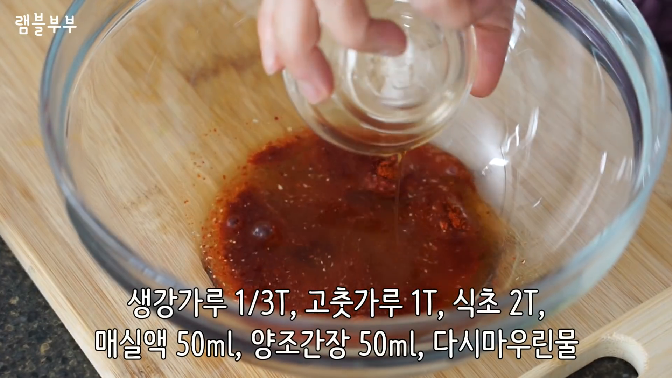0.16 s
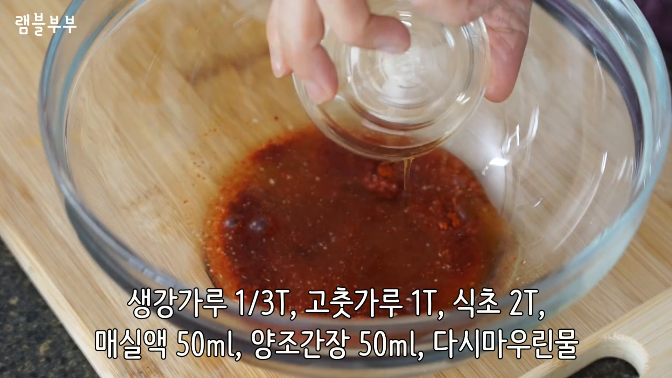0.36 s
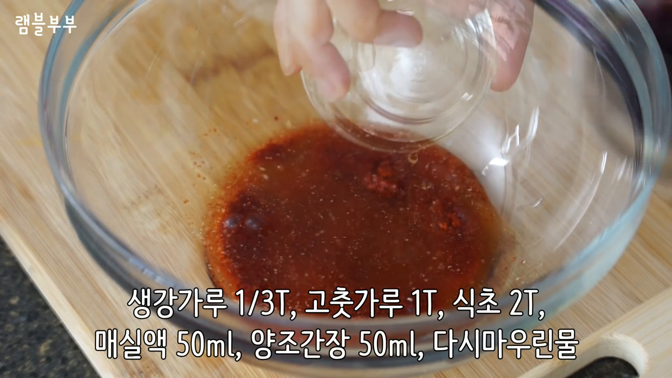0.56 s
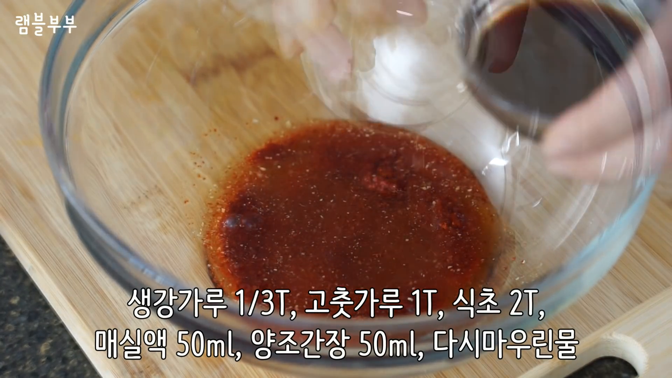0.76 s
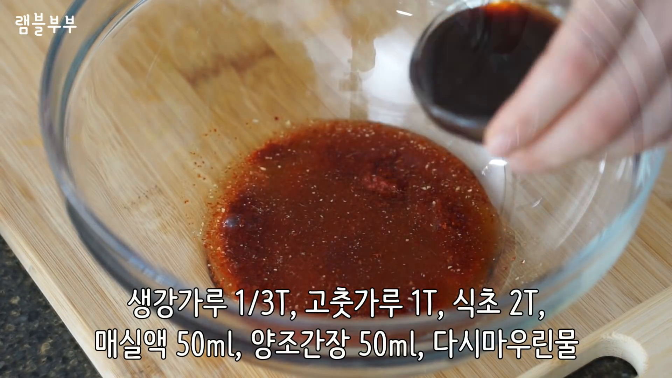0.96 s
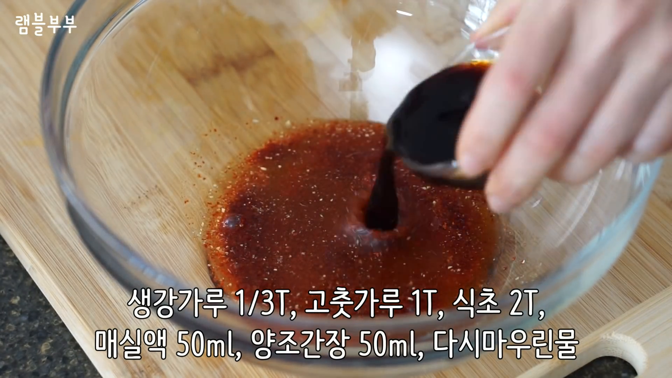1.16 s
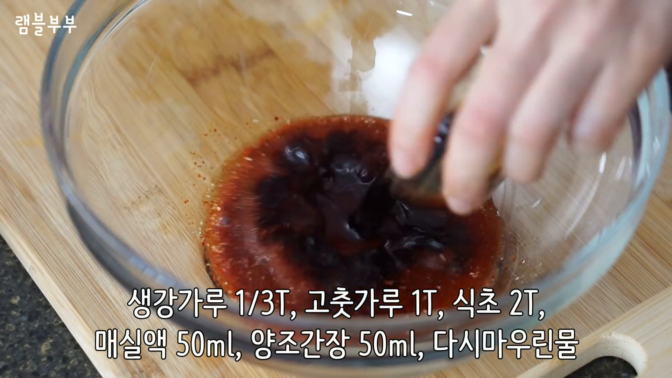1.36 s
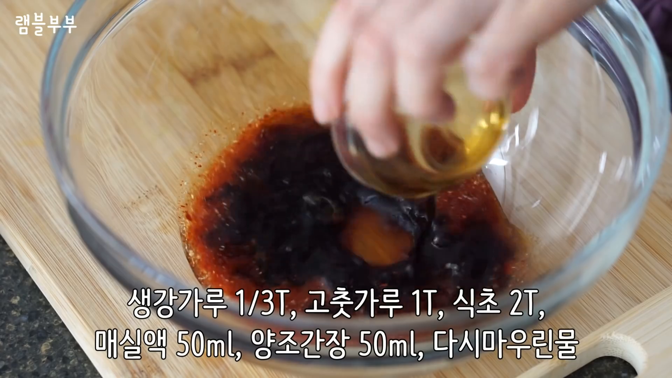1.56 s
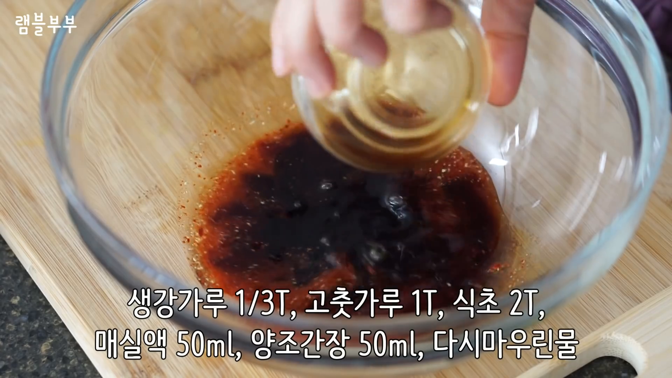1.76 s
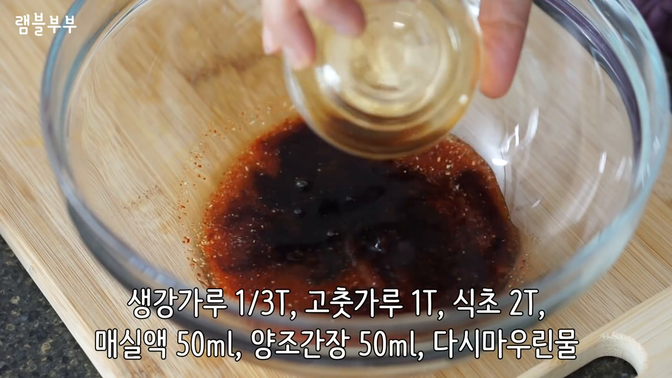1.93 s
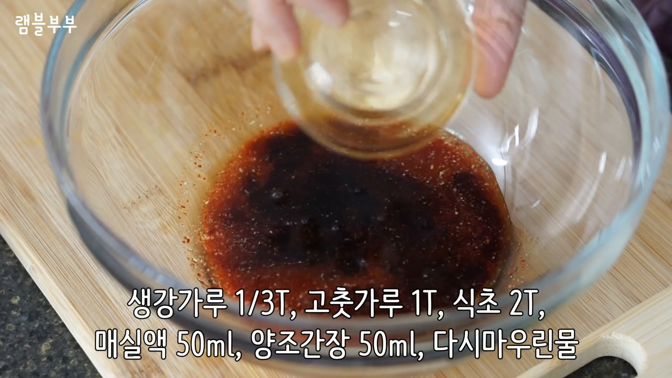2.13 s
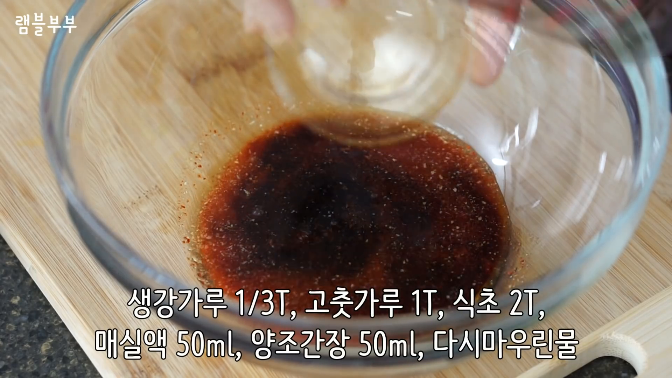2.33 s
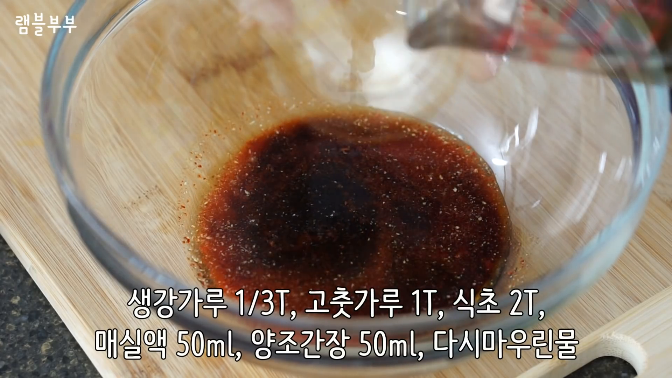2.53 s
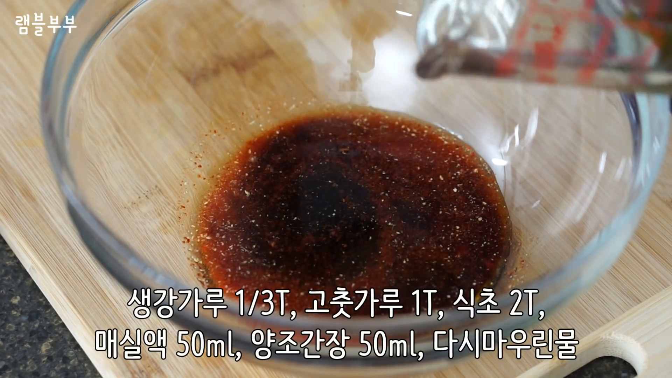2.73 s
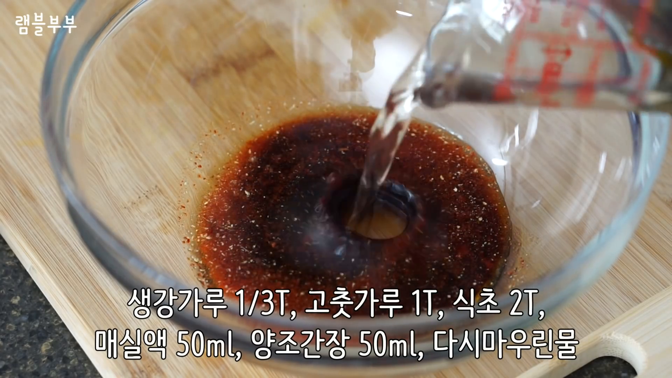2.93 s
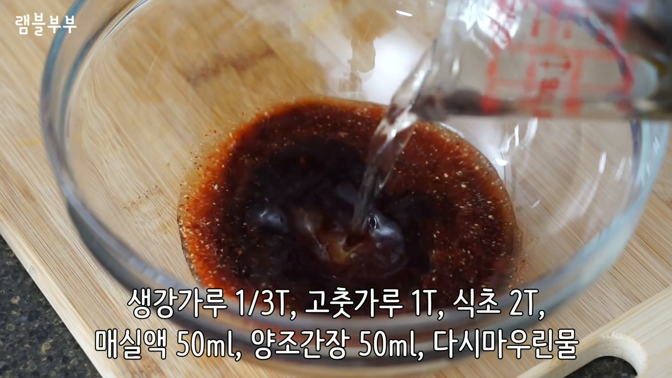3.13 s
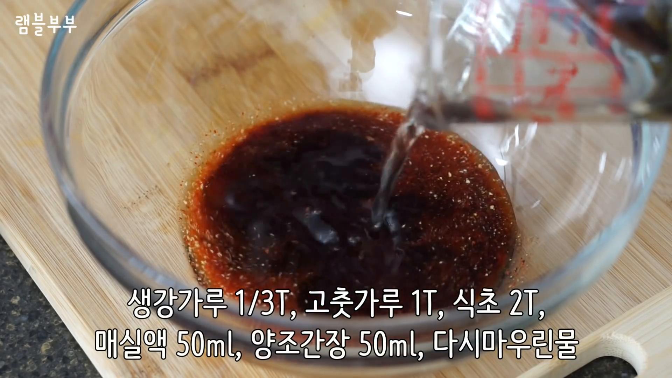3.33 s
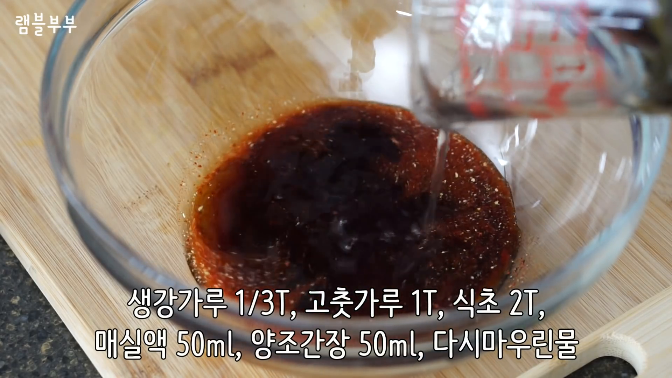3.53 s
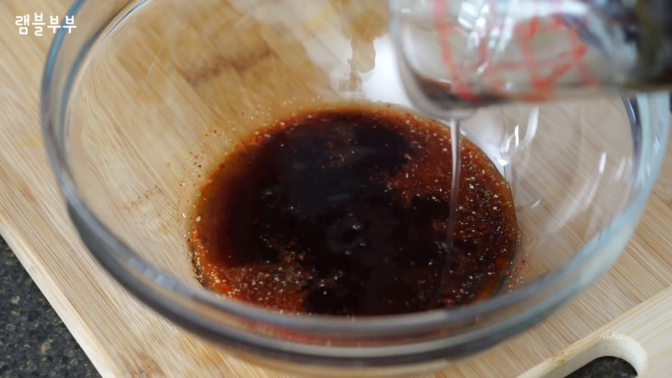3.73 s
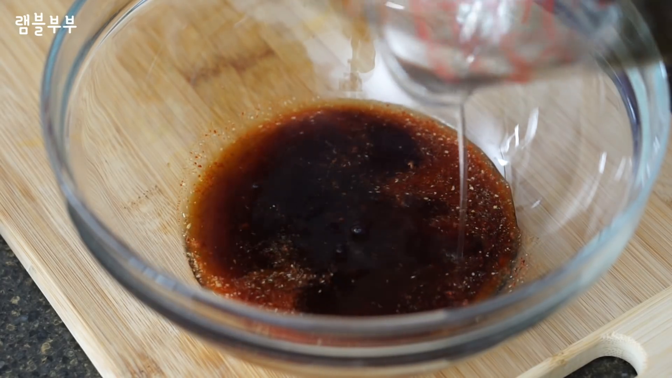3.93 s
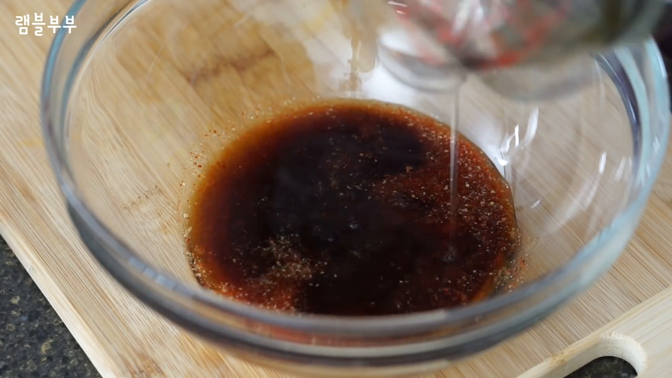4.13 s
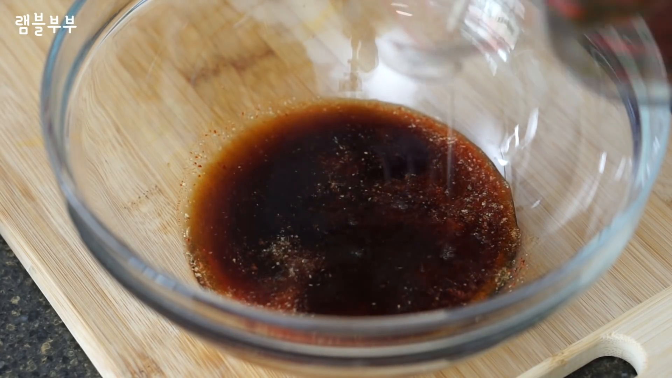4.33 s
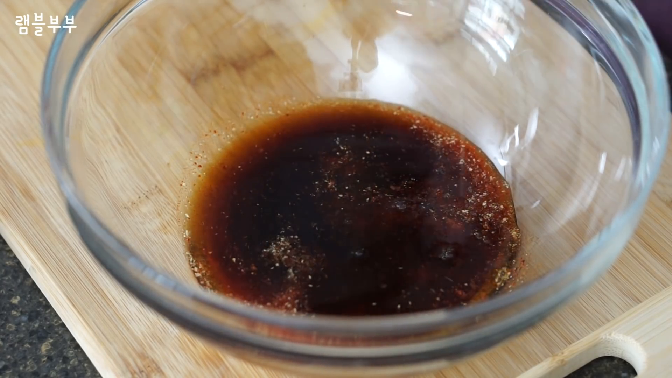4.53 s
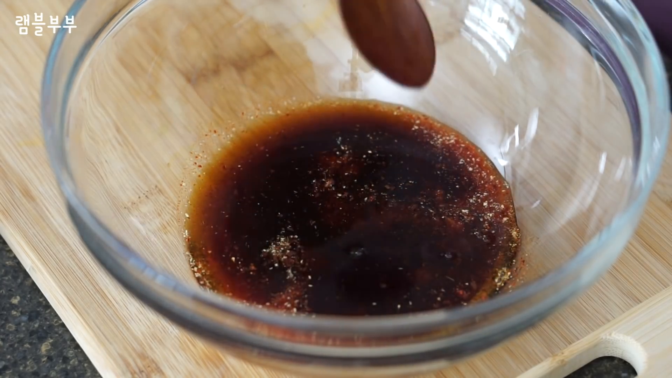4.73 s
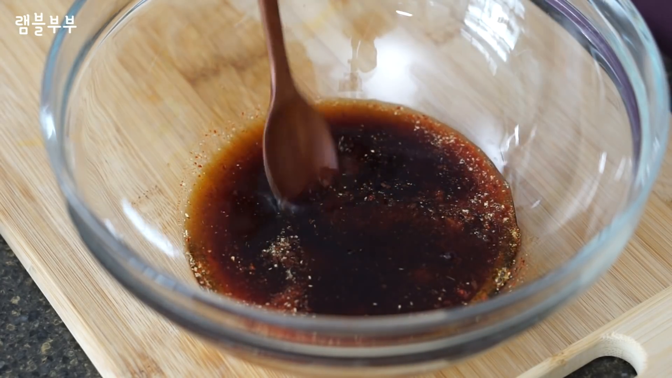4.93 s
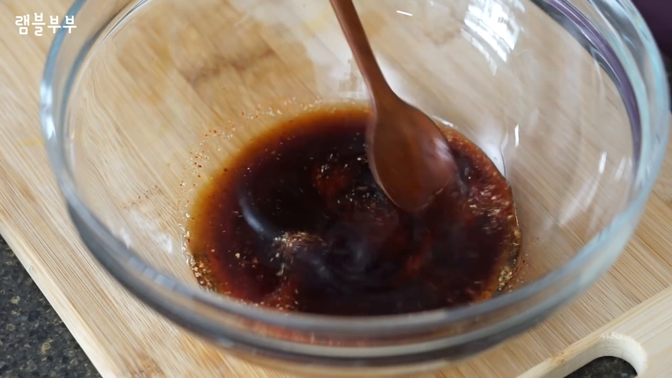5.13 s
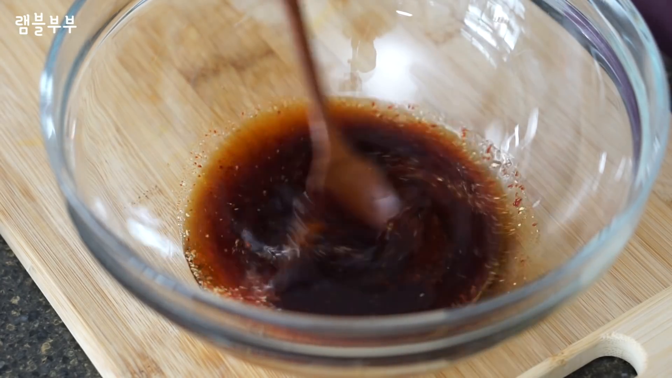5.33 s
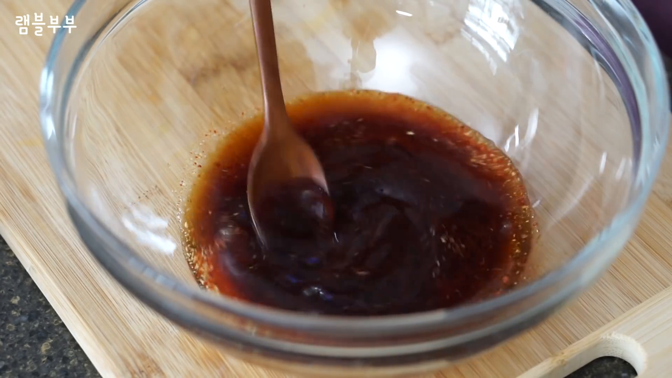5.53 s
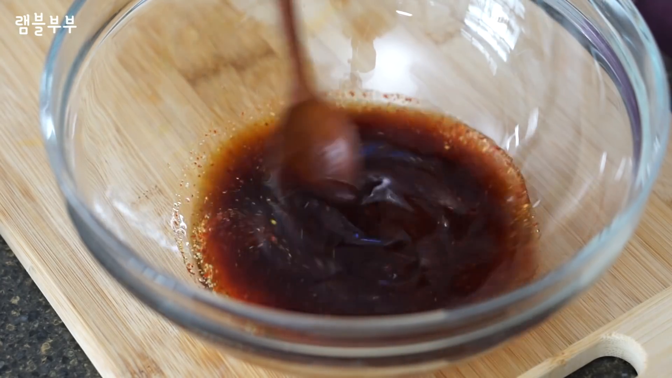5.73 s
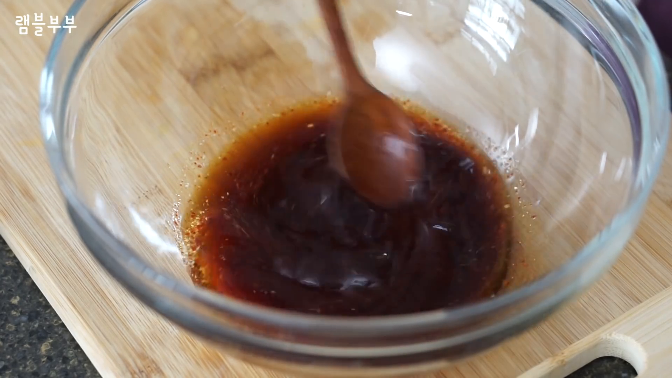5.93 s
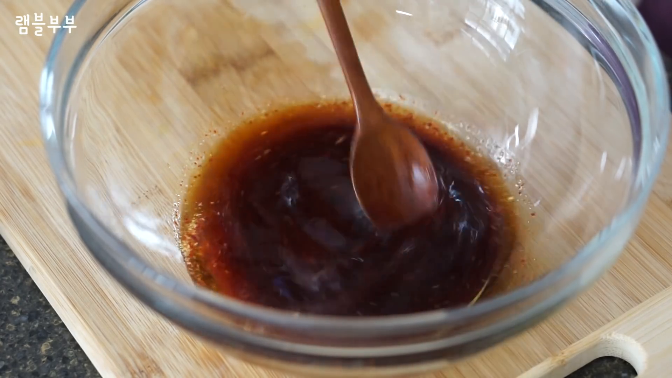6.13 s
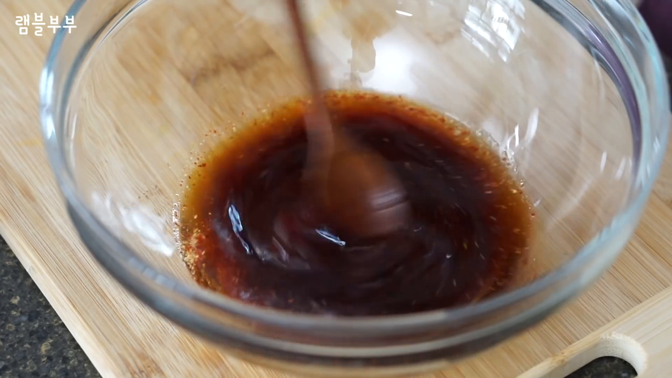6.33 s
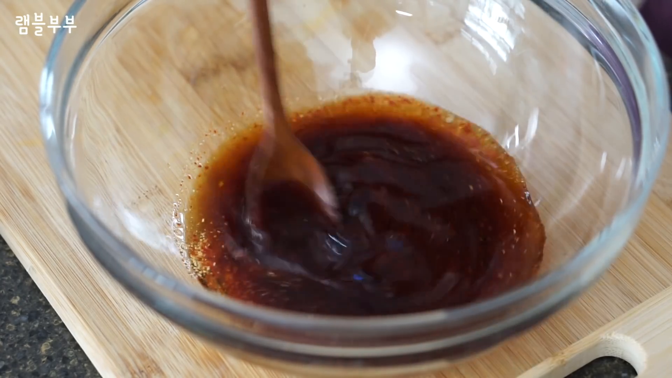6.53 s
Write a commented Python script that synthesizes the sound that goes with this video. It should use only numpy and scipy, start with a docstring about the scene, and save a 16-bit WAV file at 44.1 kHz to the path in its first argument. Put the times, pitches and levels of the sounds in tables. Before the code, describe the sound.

In a small kitchen with low rumble, soft hiss and faint appliance hum, a faint glass tick precedes a quick glugging pour of sauce into a glass bowl. After a pause, thinner stock splashes in. A wooden spoon then stirs wetly, clacks sharply on the glass and knocks the bowl once on its wooden board with a dull ringing thud, followed by bright plinking drips. Close stereo microphone, short echo.

```python
"""Liquid glugs, plinks and spatters as soy sauce and stock are tipped into a glass bowl of sauce and stirred.
Ringing air bubbles make the glugs, froth and burble; short noise clicks make the slaps; gusting noise is the splash.
Glass clacks are clicks with brief modes. A wooden spoon knocks the bowl once on its wooden board: thud plus modes.
Nearby surfaces and a small kitchen echo the liquid and clacks. Behind lie rumble, soft hiss and an appliance hum,
with a faint thin whine that comes and goes."""
import sys
import numpy as np
from scipy import signal
from scipy.fft import rfft, irfft
from scipy.io import wavfile

SR = 44100
rng = np.random.default_rng(int(sys.argv[2]) if len(sys.argv) > 2 else 0)


def materialize(psi):
    """Save the field psi as 16-bit PCM at rate SR to the path in sys.argv[1].

    A 1-D psi becomes a single channel; in a 2-D psi each row is a channel.
    """
    bounded = np.clip(np.atleast_2d(psi).T, -1, 1)
    quanta = np.round(bounded * 32767).astype(np.int16)
    wavfile.write(sys.argv[1], SR, quanta)


N = 294147
T = np.arange(N) / SR


def undb(db):
    """Decibels to gain."""
    return 10 ** (np.asarray(db) / 20)


def unit(x):
    """Scale to rms 1."""
    return x / np.sqrt(np.mean(x ** 2))


def fade(t, t60):
    """Free decay, 60 dB in t60 seconds."""
    return np.exp(-np.log(1000) * t / t60)


def add(out, s, sound):
    """Mix a sound in at time s."""
    i = int(s * SR)
    out[..., i:i + sound.shape[-1]] += sound[..., :max(N - i, 0)]


def colour(x, points):
    """Filter by a spectrum of (f/Hz, level/dB) points, joined on a log frequency axis."""
    hz, db = np.transpose(points)
    f = np.fft.rfftfreq(x.shape[-1], 1 / SR)
    gain = undb(np.interp(np.log(f + 1), np.log(hz), db))
    return irfft(rfft(x) * gain, x.shape[-1])


def band(x, hz, kind, order=2):
    """Butterworth filter."""
    hz = np.minimum(hz, SR / 2 - 1000)
    return signal.sosfilt(signal.butter(order, hz, kind, fs=SR, output="sos"), x)


def pan(db):
    """Channel gains for a left-minus-right level."""
    return undb(np.array([[db], [-db]]) / 2)


def stereo_noise(side_db, wide_hz):
    """Noise that is alike in both channels in the bass and spreads out above wide_hz."""
    mid, side = rng.standard_normal((2, N))
    side = undb(side_db) * band(side, wide_hz, "high", order=1)
    return mid + side * np.array([[1], [-1]])


def bubble(hz, t60, rise, wobble, onset=0.057):
    """A pocket of air pinches off and rings; its pitch glides by rise octaves/s and wobbles as it deforms."""
    t = T[:int(t60 * SR) + 2]
    swing = (1 - np.exp(-t / (onset * t60))) * fade(t, t60)
    shape = np.interp(t, np.linspace(0, t60, len(wobble)), wobble)
    pitch = np.minimum(hz * 2 ** (rise * t + shape), SR / 2)
    phase = 2 * np.pi * np.cumsum(pitch) / SR
    return swing / swing.max() * np.sin(phase)


def plink(hz, t60, rise, wobble_octave_s=.0009, max_wobble_octaves=.05):
    """One bubble; the sooner it dies, the rougher its pitch, up to a limit."""
    depth = min(wobble_octave_s / t60, max_wobble_octaves)
    return bubble(hz, t60, rise, depth * rng.standard_normal(size=48))


def slap(hz, broad, broad_hz, t60=0.011, spread=1.48, gain_db=6):
    """An impact: a short broad click above broad_hz plus a bright band around hz, set to a fixed energy."""
    t = T[:1024]
    burst = rng.standard_normal(len(t)) * fade(t, t60)
    bright = band(burst, [hz / spread, hz * spread], "band")
    click = bright + broad * band(burst, broad_hz, "high", order=1)
    return undb(gain_db) * click / np.linalg.norm(click)


# large pockets of air dragged under by the stream or the spoon, before the kitchen's echo:
# t/s, peak level/dB, f/Hz, t60/s, pitch glide/(octaves/s)
GLUGS = [(1.271, -26.5, 973, .057, 3.5), (1.301, -31, 1262, 0.081, 12), (1.315, -40.5, 1904, 0.072, 26.5),
         (1.379, -42, 1490, 0.049, 3), (1.385, -33, 947, .085, 16.5), (1.646, -44.5, 2063, 0.079, 9.5),
         (3.022, -37, 720, .13, 9), (3.066, -31, 1480, 0.023, -10), (3.066, -29.5, 943, 0.23, 0.5),
         (3.087, -35, 2690, 0.025, 2.5), (5.373, -42, 1375, 0.12, 0.5), (6.163, -23.5, 2160, 0.053, -1.5)]


def glugs():
    """Large air pockets ring and glide, most of them upwards, as they near the surface."""
    out = np.zeros(N)
    for s, db, hz, t60, rise in GLUGS:
        add(out, s, undb(db) * plink(hz, t60, rise))
    return out


# drops that slap the sauce and trap a bubble under it; the slap's own gain comes on top:
# t/s, slap level/dB, bubble peak level/dB, bubble f/Hz, ring to -60 dB/cycles
DROPS = [(1.266, -32, -36.5, 2830, 50), (1.290, -20, -46, 3380, 64), (1.3834, -25, -39.5, 3040, 88),
         (1.441, -26, -41.5, 3320, 100), (1.4617, -17.5, -41, 2950, 70), (1.52, -30, -45, 4540, 180),
         (1.6087, -35, -34, 5440, 56), (1.6452, -30, -50, 2100, 40), (1.676, -24.5, -51, 2400, 50),
         (1.8809, -28.5, -62, 4270, 59), (3.0106, -27.5, -45, 5500, 50), (3.0754, -32, -40, 4970, 100),
         (3.143, -30, -38.5, 3310, 120), (3.2, -40, -48, 2370, 60), (5.0756, -33, -47.5, 2860, 90),
         (5.360, -25, -46, 2100, 12), (5.3685, -21.5, -39, 3060, 230), (5.3916, -20.5, -42, 3080, 63),
         (5.491, -27, -42, 3020, 54), (5.669, -29, -44.5, 3960, 51), (6.157, -24, -22, 2680, 11.5),
         (6.265, -36, -24.5, 2600, 40), (6.358, -31, -27, 3040, 41), (6.405, -24, -15.5, 3030, 71),
         (6.517, -46, -24.5, 2640, 32), (6.5985, -31, -31.5, 11950, 60), (6.652, -14.5, -10, 2870, 50)]


def drops(slap_lag_s=.0008, bubble_lag_s=.0009, rise_octaves_per_s=2.3):
    """Each drop slaps the surface, and its crater closes over a small bubble."""
    out = np.zeros(N)
    for s, slap_db, bubble_db, hz, cycles in DROPS:
        impact = slap(hz=11540, broad=1.0, broad_hz=3500)
        add(out, s + slap_lag_s, undb(slap_db) * impact)
        trapped = plink(hz, cycles / hz, rise_octaves_per_s)
        add(out, s + bubble_lag_s, undb(bubble_db) * trapped)
    return out


# gushes of soy sauce, of stock and off the spoon, which churn the liquid:
# t/s, share of full churn, time from start to settling/s, settling time constant/s
GUSHES = [(1.255, .78, 0.093, .17), (3.002, .75, .19, 0.034), (5.35, 0.39, .04, .03),
          (5.863, 1, 0.045, 0.044)]


def churning(attack_s=.028, stir_s=5.0, stir_build_s=0.88, stir_churn=0.17):
    """Agitation of the liquid: each gush rises, holds and settles, on top of steady stirring that builds up."""
    churn = stir_churn * np.clip((T - stir_s) / stir_build_s, 0, 1)
    for s, share, hold, settle in GUSHES:
        attack = np.clip((T - s) / attack_s, 0, 1)
        churn = churn + share * attack * np.exp(-np.maximum(T - s - hold, 0) / settle)
    return churn


def fizz(churn, count, low_hz, high_hz, cycles, gain_db, scatter_db, tilt_db):
    """A swarm of bubbles in a range of sizes; a harder churn whips in more of them, and louder ones."""
    out = np.zeros(N)
    for when, chance, size, strength in rng.random((count, 4)):
        share = churn[int(when * N)]
        if chance < share:
            hz = low_hz * (high_hz / low_hz) ** size
            # most stay near the base level, a few stand out
            db = gain_db + tilt_db * size - scatter_db * np.log(max(strength, .02))
            ring = bubble(hz, cycles / hz, 13.7, [0, 0])
            add(out, when * N / SR, undb(db) * np.sqrt(share) * ring)
    return out


def spray(churn, count=400, db=-35, scatter_db=4.5):
    """Fine droplets thrown up by the churn fall back at random."""
    out = np.zeros(N)
    for when, chance, strength in rng.random((count, 3)):
        if chance < churn[int(when * N)]:
            level = undb(db + scatter_db * (2 * strength - 1))
            add(out, when * N / SR, level * slap(hz=7000, broad=.5, broad_hz=2500))
    return out


def splash(churn, db=-50, low_hz=800, high_hz=6000, flutter_hz=35, flutter_db=6.5):
    """The stream tears the surface: a wet hiss that comes in quick, uneven spurts."""
    spurts = undb(flutter_db * unit(band(rng.standard_normal(N), flutter_hz, "low")))
    wet = band(rng.standard_normal(N), [low_hz, high_hz], "band", order=1)
    return undb(db) * churn ** 2 * unit(spurts * wet)


# light clacks of cup, jug and spoon against glass; the click's own gain comes on top:
# t/s, click level/dB, ring peak level/dB, brightest f/Hz, t60/s
CLACKS = [(.5143, -28, -31, 2490, .035), (2.79, -31, -34.5, 1620, 0.028), (5.882, -31, -32, 2440, 0.0099),
          (5.892, -13.5, -15, 2270, 0.0045), (5.914, -10, -15, 4140, 0.013)]
# ringing modes shared by the clacks: f/Hz, relative level/dB
CLACK_MODES = [(1040, 5.5), (1340, -4), (2250, -10), (2660, -0.5), (2840, 0.5), (3200, -1.5), (3750, -8),
               (4260, 1), (4650, -1)]


def clacks(focus_octaves=0.63, lag_s=0.00091):
    """A hard contact clicks and rings briefly; each one favours the modes near its own brightest pitch."""
    out, t = np.zeros(N), T[:SR // 10]
    hz, db = np.transpose(CLACK_MODES)
    modes = np.sin(2 * np.pi * hz[:, None] * t)
    for s, click_db, ring_db, bright_hz, t60 in CLACKS:
        gain = undb(db) * np.exp(-(np.log2(hz / bright_hz) / focus_octaves) ** 2)
        ring = gain @ modes * fade(t, t60) * (1 - fade(t, t60 / 2))
        add(out, s + lag_s, undb(click_db) * slap(hz=10700, broad=2.4, broad_hz=2500))
        add(out, s + lag_s, undb(ring_db) * ring / np.abs(ring).max())
    return out


# lasting modes of bowl and board under the spoon's knock: f/Hz, relative level/dB
BOWL_MODES = [(252.5, -12), (418, -7.5), (554, -7.5), (710, -7.5), (845, -17), (930, -1), (974, 0.5),
              (1015, -14), (1227, -6), (1271, -6.5), (1351, -11.5), (1524, -14.5), (1605, -9), (2158, -29),
              (2455, -12.5)]
# spectrum of the dense thud between those modes: f/Hz, relative level/dB
THUD = [(35, -50), (70, -29), (150, -12), (250, -5.5), (450, -6), (700, -5), (960, 2), (1150, -5),
        (1500, -7.5), (2000, -12.5), (2600, -18), (3400, -26), (6000, -43.5), (16000, -55)]


def knock(knock_s=6.1925, thud_db=-18.0, thud_t60=0.65, ring_db=-21, ring_t60=0.62, bass_t60=0.46,
          bass_hz=450, onset_t60=0.0027, pan_db=-4, phase_spread=0.5):
    """The spoon hits the bowl on its board: a dense, dull thud and a few lasting modes."""
    out, t = np.zeros((2, N)), T[:SR]
    noise = stereo_noise(-1.2, 1100)[:, :SR]
    # the board damps the bass sooner than the rest
    bass = band(noise, bass_hz, "low", order=1)
    decaying = bass * fade(t, bass_t60) + (noise - bass) * fade(t, thud_t60)
    blow = decaying * (1 - fade(t, onset_t60))
    thud = colour(blow, THUD) / np.std(colour(rng.standard_normal(SR), THUD))
    hz, db = np.transpose(BOWL_MODES)
    gain = undb(db) / np.linalg.norm(undb(db))
    # each mode reaches the two channels by its own paths
    phase = rng.uniform(0, 2 * np.pi, (len(hz), 1)) + phase_spread * rng.standard_normal((2, len(hz), 1))
    modes = np.sqrt(2) * gain @ np.sin(2 * np.pi * hz[:, None] * t + phase)
    # soft wood sets the modes going over a few ms
    ring = modes * fade(t, ring_t60) * (1 - fade(t, 0.038))
    add(out, knock_s, undb(thud_db) * thud + undb(ring_db) * ring)
    # only the shorter waves favour one side
    return out + (pan(pan_db) - 1) * band(out, 350, "high", order=1)


# echoes from nearby surfaces, before their bass is cut: delay/s, left gain, right gain
ECHOES = [(.005, 0.045, 0.83), (.0083, 0.25, 0.41), (0.0142, .1, .24)]


def kitchen(x, pan_db=-4, tail_db=-6, t60=0.57, treble_db=-8, treble_t60=0.1, split_hz=5000, echo_hz=1800):
    """Direct sound, a few bright echoes, then a diffuse tail whose treble dies first."""
    t = T[:SR]
    early = np.zeros((2, SR))
    for delay, left, right in ECHOES:
        early[:, int(delay * SR)] = left, right
    response = band(early, echo_hz, "high", order=1)
    response[:, :1] += pan(pan_db)
    build = 1 - np.exp(-t / 0.016)
    for kind, db, decay in (("low", tail_db, t60), ("high", treble_db, treble_t60)):
        tail = unit(rng.standard_normal((2, SR)) * build * fade(t, decay)) / np.sqrt(SR)
        response += undb(db) * band(tail, split_hz, kind)
    return signal.fftconvolve(x[None], response, axes=1)[:, :N]


# slow level moves of the background, before the trims below: t/s, rumble level/dB, hiss level/dB
BACKGROUND_DB = [(0.0, -51.5, -60), (0.36, -55.5, -62.5), (0.83, -55, -59), (1.27, -50, -58.5),
                 (1.5, -53, -53), (1.9, -53.5, -59.5), (2.17, -56, -63.5), (2.46, -56, -63),
                 (3.26, -51.5, -56), (3.37, -51, -58.5), (4.35, -56.5, -61), (4.69, -51, -53),
                 (5.31, -53.5, -58.5), (5.85, -52, -55.5)]
# spectrum of the low room noise: f/Hz, relative level/dB
RUMBLE = [(12, -34), (20, 1.5), (43, -12), (98, 0.5), (124, -5.5), (146, -5), (185, -6.5), (312, -5.5),
          (481, -13.5), (677, -11.5), (728, -15), (955, -13), (1500, -23), (1950, -32), (3300, -120)]
# spectrum of the soft hiss: f/Hz, relative level/dB
HISS = [(590, -21), (1000, -2), (1710, -3.5), (2150, -2), (4120, -5.5), (5900, -8.5), (11600, -6.5),
        (15100, -5.5), (16000, -32)]
# tones of the appliance hum: f/Hz, rms level/dB
HUM = [(96.9, -65.5), (263.8, -82), (301.5, -66.5), (689.1, -66), (942, -77.5), (1437, -74.5),
       (2191, -83.5), (2789, -78)]


def background(rumble_db=2.0, hiss_db=5.0, waver_rad=0.62, rush_s=4.68, rush_width_s=0.095, rush_db=3):
    """Low room noise and hiss swell and sink, with one soft rush; an appliance hums, wavering in phase."""
    s, *columns = np.transpose(BACKGROUND_DB)
    low_db, high_db = (np.interp(T, s, c) for c in columns)
    rush = rush_db * np.exp(-((T - rush_s) / rush_width_s) ** 2)
    rumble = unit(colour(stereo_noise(2.65, 600), RUMBLE)) * undb(low_db + rumble_db) * pan(-0.4)
    hiss = unit(colour(stereo_noise(0.45, 540), HISS)) * undb(high_db + hiss_db + rush) * pan(-2.0)
    hum = 0
    for hz, db in HUM:
        drift = unit(band(rng.standard_normal(N), 4.2, "low"))
        hum = hum + undb(db) * np.sqrt(2) * np.sin(2 * np.pi * hz * T + waver_rad * drift)
    return rumble + hiss + hum


# short runs of a thin whine: t/s, length/s
WHINE_RUNS = [(.3, 0.3), (3.1, 0.39), (4.344, 0.41), (5.78, 0.55)]


def thin_whine(hz=10150, width_hz=300, db=-66):
    """A faint, high whine: a narrow band of noise that fades in and out quickly."""
    running = sum((T > s) & (T < s + length) for s, length in WHINE_RUNS)
    whine = unit(band(stereo_noise(0, 800), [hz - width_hz / 2, hz + width_hz / 2], "band"))
    return undb(db) * whine * band(1. * running, 23, "low")


def scene():
    """Liquid sounds and clacks in the kitchen, the knock, the background and the whine."""
    churn = churning()
    froth = fizz(churn, count=9000, low_hz=1008, high_hz=12100, cycles=26.7,
                 gain_db=-54.5, scatter_db=3.5, tilt_db=2)
    burble = fizz(churn ** 2, count=900, low_hz=1206, high_hz=5000, cycles=70,
                  gain_db=-45.5, scatter_db=2.5, tilt_db=0)
    liquid = glugs() + drops() + froth + burble + spray(churn) + splash(churn)
    return kitchen(liquid + clacks()) + knock() + background() + thin_whine()


def record(dry, top_hz=16000):
    """A steep low-pass cuts the top of the treble."""
    return signal.sosfilt(signal.ellip(10, .2, 80, top_hz, fs=SR, output="sos"), dry)


dry = scene()
out = record(dry)
materialize(out)
```